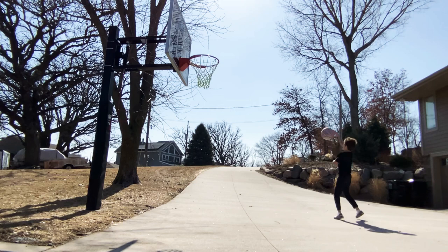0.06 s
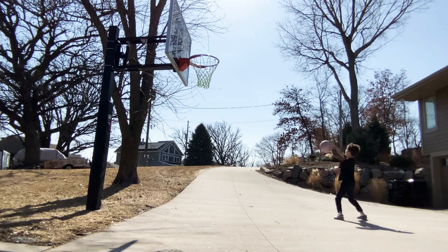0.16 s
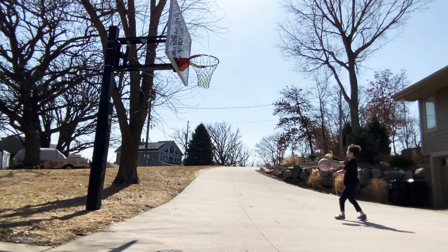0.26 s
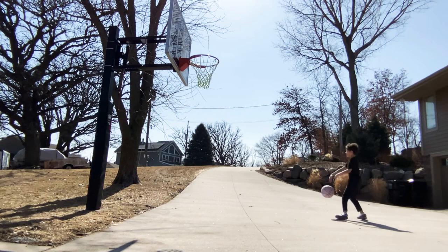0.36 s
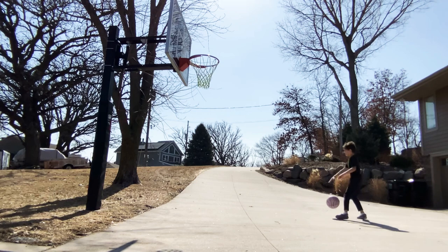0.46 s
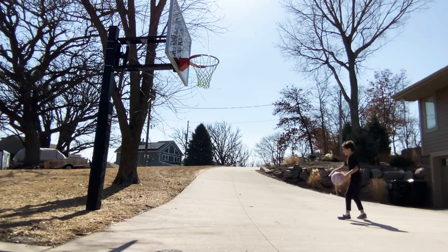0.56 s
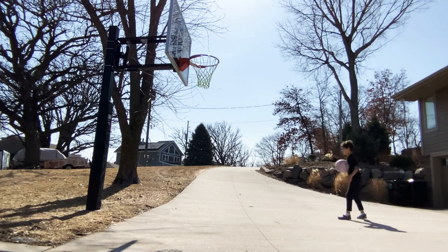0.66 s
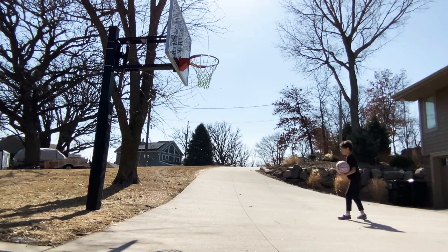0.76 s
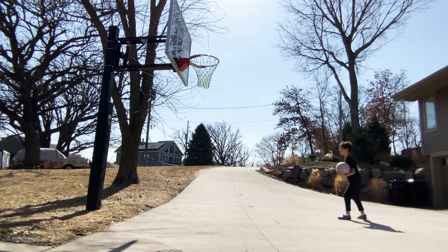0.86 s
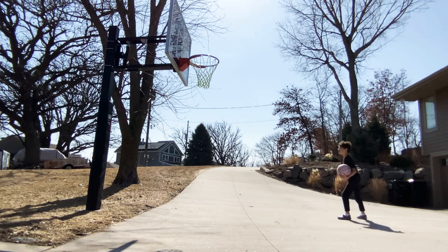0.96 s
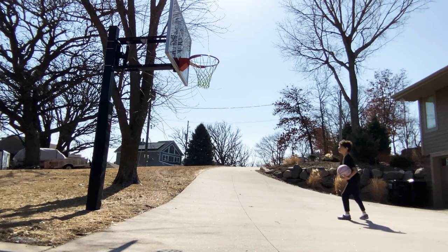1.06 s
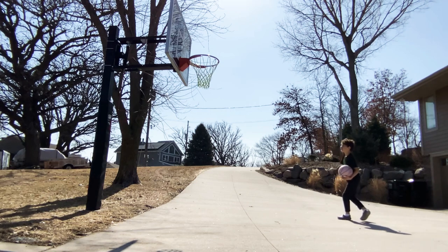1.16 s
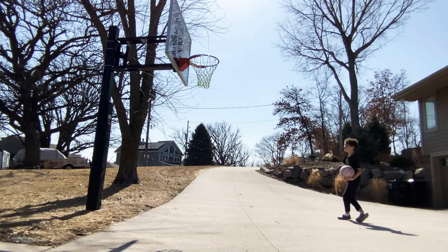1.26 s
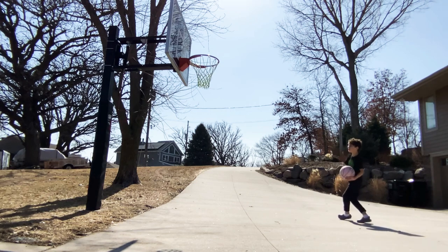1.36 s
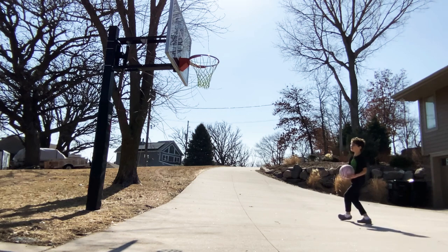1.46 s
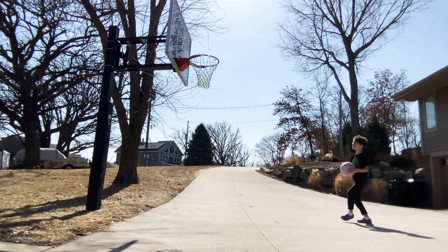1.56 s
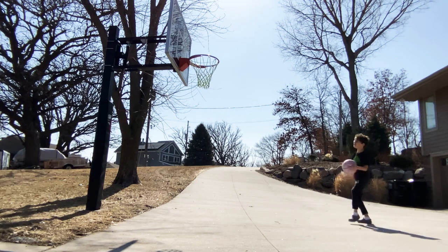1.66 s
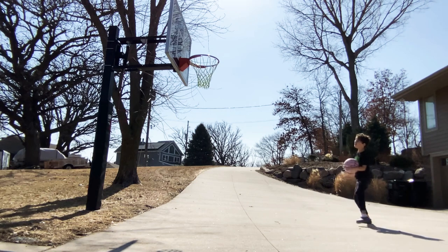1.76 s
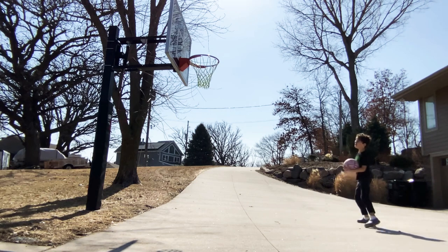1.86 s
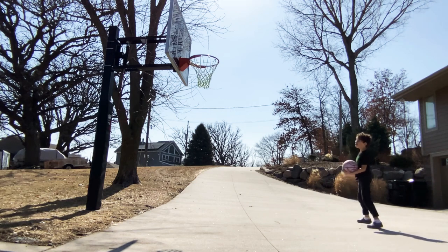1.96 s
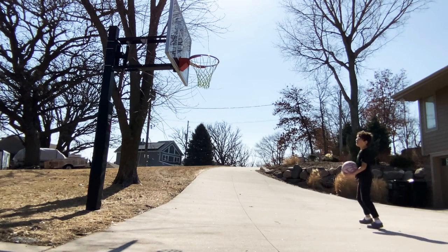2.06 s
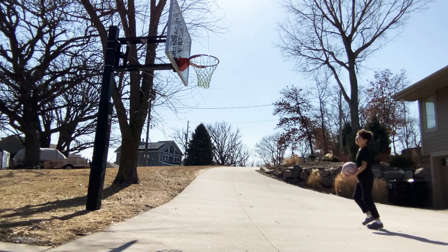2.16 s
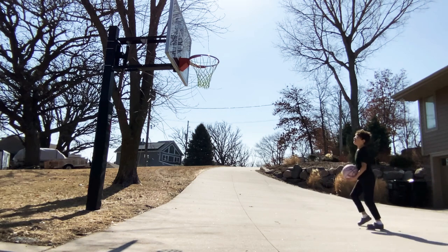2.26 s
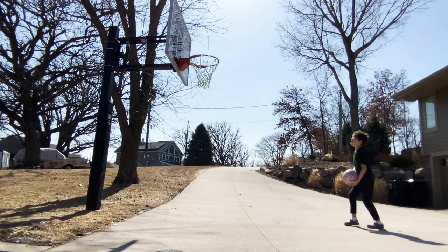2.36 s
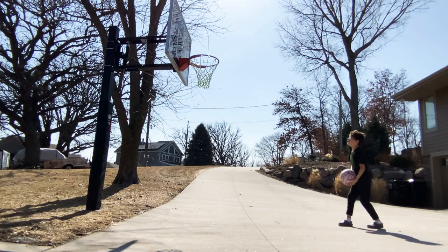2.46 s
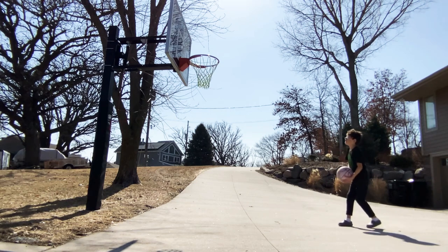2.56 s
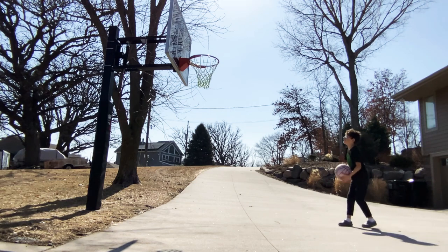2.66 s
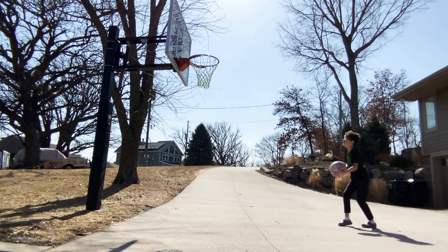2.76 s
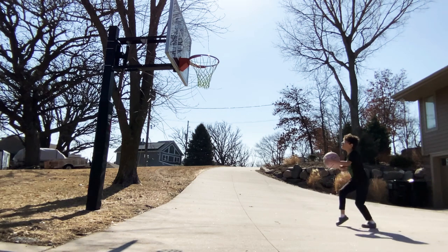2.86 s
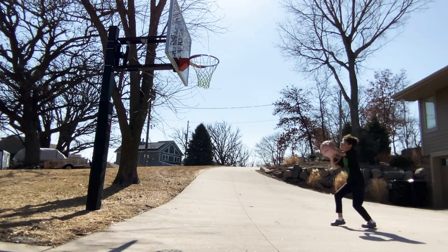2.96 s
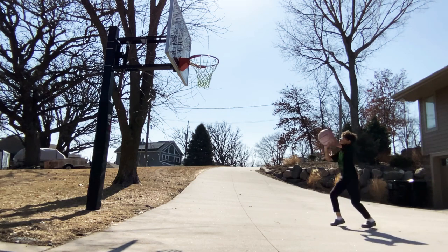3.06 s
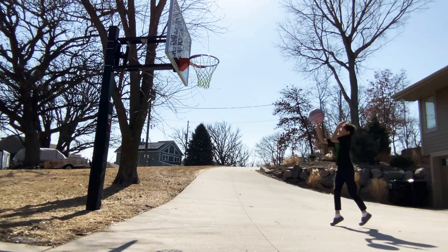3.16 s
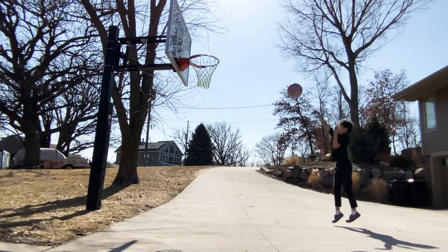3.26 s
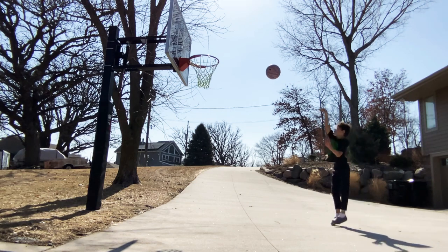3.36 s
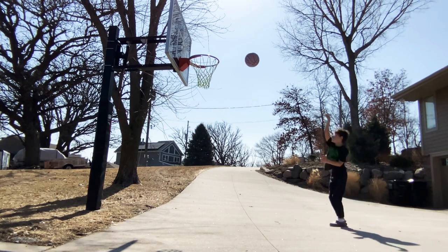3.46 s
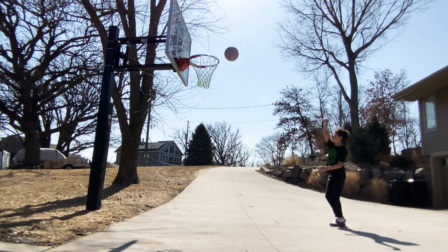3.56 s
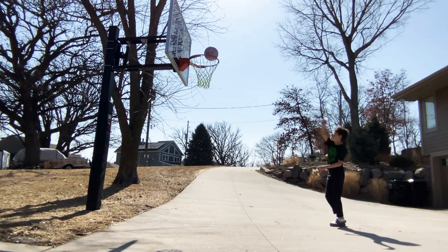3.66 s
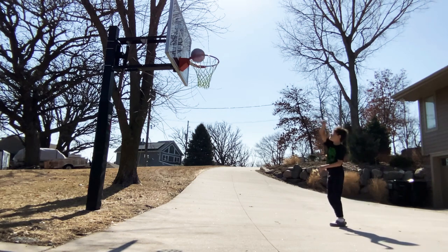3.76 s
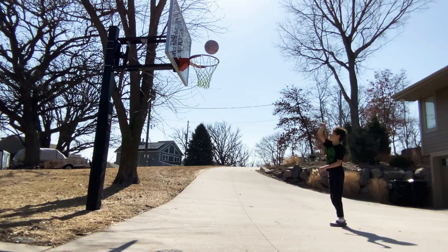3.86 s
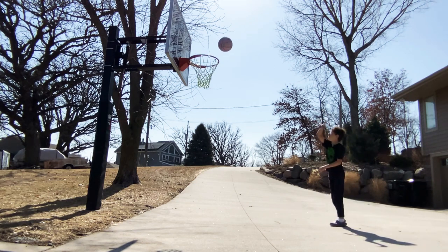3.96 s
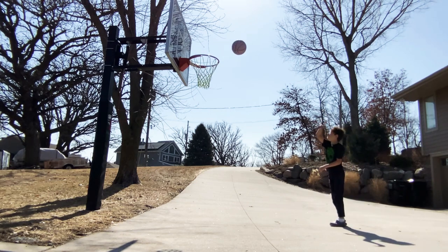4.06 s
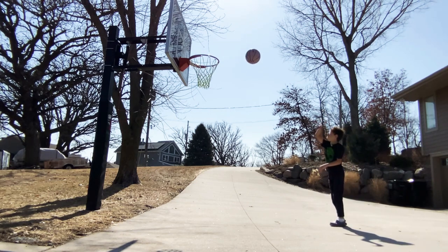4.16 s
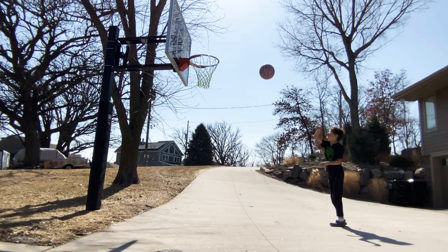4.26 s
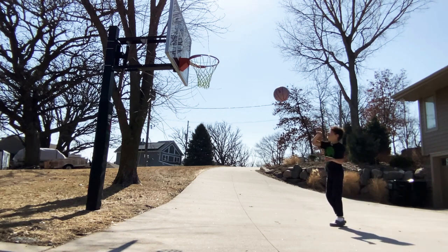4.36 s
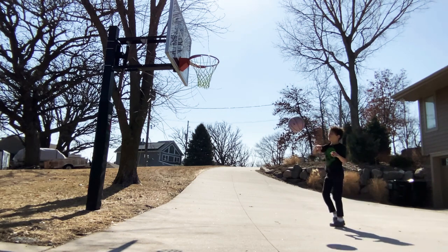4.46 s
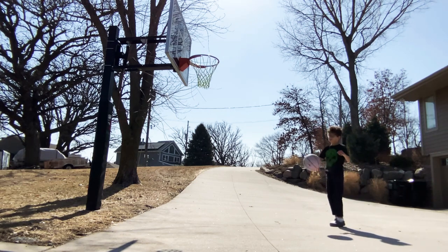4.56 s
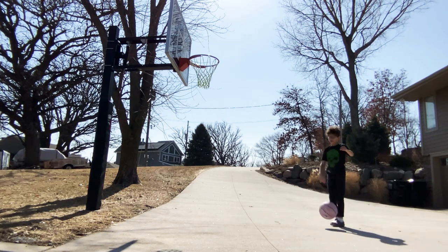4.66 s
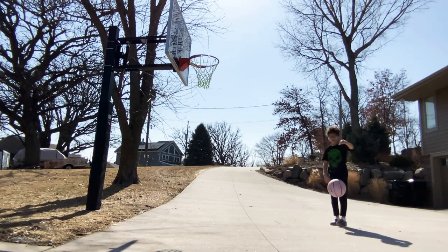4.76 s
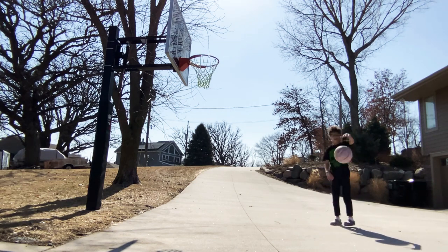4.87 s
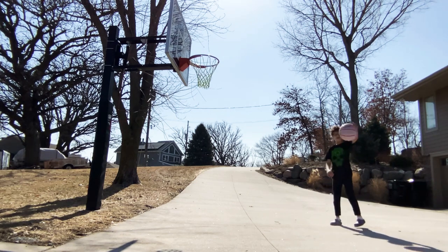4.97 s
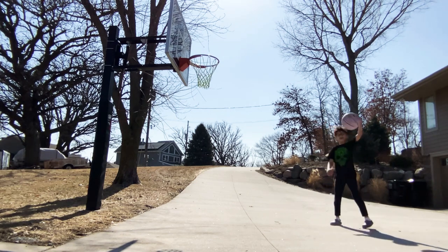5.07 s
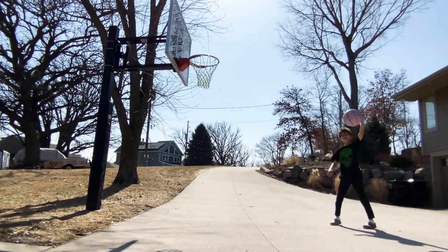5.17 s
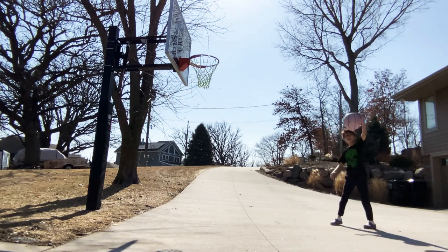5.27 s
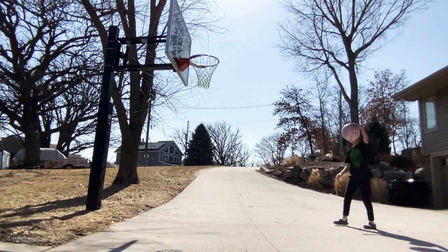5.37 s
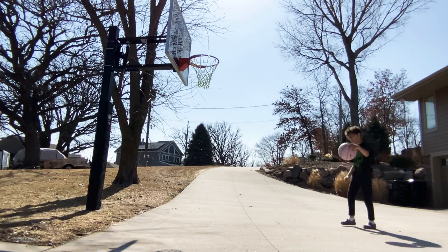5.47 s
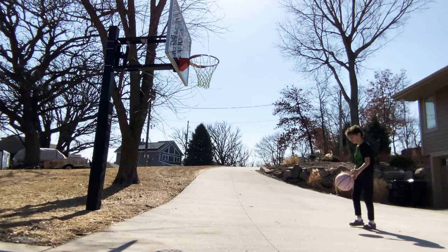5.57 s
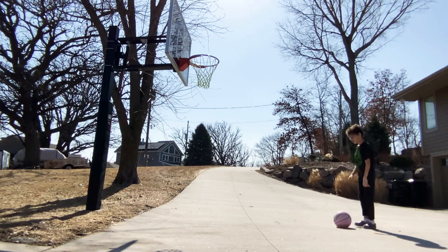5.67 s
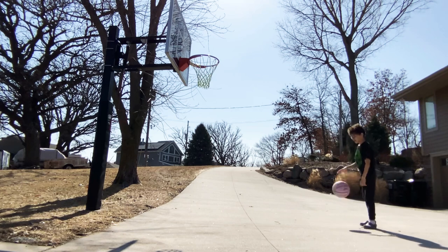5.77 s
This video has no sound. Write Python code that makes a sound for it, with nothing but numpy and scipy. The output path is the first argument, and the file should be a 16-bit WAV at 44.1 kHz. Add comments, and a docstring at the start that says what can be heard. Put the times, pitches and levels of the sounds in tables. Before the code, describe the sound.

A distant microphone hears a child playing basketball outside. First come quick gritty scuffs and one hollow, ringing bounce, then hands catching the ball. Shoes shuffle and squeak dully, pebbles crackle, and feet land after a jump. The ball knocks the hoop, low and rattly. A loud bounce, a palm smack, light drags and steps, and a last bounce finish it, with scattered short echoes and very quiet outdoor air.

```python
"""A faint outdoor rumble, then sneakers scuffing over grit: a child plays basketball on a concrete driveway.
Hands catch the ball, it bounces hard three times, and a shot knocks the hoop; house and trees answer it all.
Grit, palms and rumble are shaped noise. Rubber and the ball's skin are resonances struck by noise or tiny clicks.
The ball's air and the hoop are fading sine tones, and the echoes are dying noise tails."""
import sys
import numpy as np
from scipy import signal
from scipy.fft import rfft, irfft, next_fast_len
from scipy.io import wavfile
from scipy.ndimage import uniform_filter1d, map_coordinates

SR = 44100
rng = np.random.default_rng(int(sys.argv[2]) if len(sys.argv) > 2 else 0)


def master_out(mix):
    """Clip the mix to full scale and print it as 16-bit PCM to the path in sys.argv[1]."""
    frames = np.transpose(np.atleast_2d(mix))
    ceiling = np.clip(frames, -1, 1)
    pcm = np.round(ceiling * 32767).astype(np.int16)
    wavfile.write(sys.argv[1], SR, pcm)


N = 257103  # length in samples

# Grit under a shoe, also the pebbled skin under a palm. Each row: frequency in Hz, level in dB per Hz.
GRIT = [(300, -27), (1200, -22.5), (2100, 1.5), (2800, -9.5), (3600, -8), (4500, -4.5), (5800, 4),
        (7500, -5), (11000, 0.5), (15500, -16.5)]
# The body's weight on the slab. Each row: frequency in Hz, level in dB per Hz.
HEEL = [(80, -29.5), (160, -8.5), (350, -3.5), (600, -4), (1000, -6.5), (3000, -36.5)]
# Resonances of a rubber sole. Each row: frequency in Hz, width in Hz, level in dB.
SOLE = [(910, 240, 1), (1093, 79, 12.5), (1656, 33, 6.5), (2080, 43, -3), (3209, 340, -26)]
# The ball's wobble and the air inside it. Each row: frequency in Hz, level in dB, time to fade by 60 dB in seconds.
CAVITY = [(93, 1, 0.51), (480, 0, 0.62), (950, -10, .14), (1100, -11, 0.16), (1410, -8.5, 0.39),
          (2050, -13.5, .12)]


def amp(db):
    """Turn decibels into a plain multiplier."""
    return 10 ** (np.asarray(db) / 20)


def unit(x):
    """Scale x to an rms (average strength) of 1."""
    return x / np.sqrt(np.mean(x ** 2) + 1e-20)


def along(points, hz):
    """Read a curve of (Hz, value) points on a logarithmic frequency axis."""
    point_hz, values = np.transpose(points)
    return np.interp(np.log(hz + 1), np.log(point_hz + 1), values)


def filtered(x, response):
    """Multiply the spectrum of x by a response that depends on frequency."""
    size = next_fast_len(len(x) + SR // 4)
    spectrum = rfft(x, size) * response(np.fft.rfftfreq(size, 1 / SR))
    return irfft(spectrum, size)[:len(x)]


def coloured(x, spectrum):
    """Shape x with a curve of (Hz, dB) points, then scale it to rms 1."""
    return unit(filtered(x, lambda f: amp(along(spectrum, f))))


def peak(f, hz, width):
    """The response of one resonance, which rings only after it is struck."""
    return 1j * f * width / (hz * hz - f * f + 1j * f * width)


def body(modes, f):
    """Add up the resonances of an object, with alternating signs."""
    return sum((-1) ** k * amp(db) * peak(f, hz, width) for k, (hz, width, db) in enumerate(modes))


def second():
    """A time axis one second long."""
    return np.arange(SR) / SR


def fade(t60):
    """One second of exponential decay that falls by 60 dB in t60 seconds."""
    return np.exp(-np.log(1000) * second() / max(t60, 1e-4))


def onset(rise):
    """A soft start that approaches full level, with a time constant of rise seconds."""
    return 1 - np.exp(-second() / max(rise, 1e-5))


def noise():
    """One second of white noise."""
    return rng.standard_normal(SR)


def ring(modes):
    """Fading sine tones, at slightly new strengths for each blow."""
    total = np.zeros(SR)
    for hz, db, t60 in modes:
        tone = np.sin(2 * np.pi * (hz * second() + rng.random()))
        total += amp(db + rng.normal()) * fade(t60) * tone
    return total


def add(track, s, sound):
    """Mix a sound into the track at s seconds."""
    i = max(round(s * SR), 0)
    track[i:i + len(sound)] += sound[:len(track) - i]


def thump(rest_hz, extra_hz, glide, crest, spread):
    """The squashed ball pushes air: a few cycles that swell, die and sink in pitch."""
    t = second()
    cycles = rest_hz * t + extra_hz * glide * (1 - np.exp(-t / glide))
    swell = np.exp(-.5 * (np.log((t + 1e-6) / crest) / spread) ** 2)  # strongest at crest seconds
    return np.sin(2 * np.pi * cycles) * swell


def air():
    """Distant rumble and faint hiss: shaped noise whose level drifts slowly."""
    # The colour of the outdoor air. Each row: frequency in Hz, level in dB per Hz.
    air_colour = [(15, -39.5), (25, -8), (92, 5), (206, -4), (354, -6), (575, -8), (659, -16), (840, -11),
                  (1190, -17), (1520, -19), (1840, -20), (2550, -27.5), (3430, -32.5), (11300, -37),
                  (16000, -64.5)]
    level_db = -58.5  # rms, before the drift
    drift = np.interp(np.arange(N), np.linspace(0, N, num=18), rng.standard_normal(size=18))
    return amp(level_db + 0.35 * drift) * coloured(rng.standard_normal(N), air_colour)


def slides():
    """List whole-sole scuffs, whose rubber note sinks as the foot slows, and light toe drags, whose note rises.

    Each row: start s, length s, share before the hardest push, grit dB, rubber dB, first touch dB, Hz, Hz per s.
    """
    # The whole sole sliding. Each row: start in seconds, length in seconds,
    # share of the length before the hardest push, grit level in dB, rubber level in dB.
    scuff_rows = [(0.12, 0.033, 0.75, -34, -32.5), (0.241, 0.05, 0.35, -45.5, -50.5),
                  (0.277, 0.03, 0.29, -43, -53.5), (1.176, .11, 0.39, -32, -36.5),
                  (1.548, 0.031, 1, -42.5, -46), (1.963, 0.068, 0.76, -37, -53.5),
                  (2.132, 0.18, 0.18, -38.5, -42), (2.464, 0.089, 0.77, -31.5, -33),
                  (2.784, 0.041, 0.26, -37, -46), (2.952, 0.022, .4, -56.5, -56.5),
                  (3.05, 0.025, 0.1, -41, -42), (3.105, 0.18, 0.65, -58.5, -69),
                  (3.457, 0.15, 0.55, -57.5, -52.5)]
    # Light drags of the toe. Each row: start in seconds, length in seconds, grit level in dB.
    drag_rows = [(0.336, .12, -56.5), (0.455, .09, -59.5), (0.577, .14, -47), (1.107, 0.053, -56.5),
                 (4.337, .08, -66.5), (4.555, 0.089, -53), (4.675, .16, -45), (5.165, .09, -53.5),
                 (5.274, 0.068, -50.5)]
    scuff_touch_db, scuff_hz, scuff_glide_hz_per_s = -12, 1099, -550
    # the stiffer toe sounds higher and rises as it bends
    drag_touch_db, drag_hz, drag_glide_hz_per_s = -15.5, 1437, 4500
    drag_crest, drag_rubber_db = .6, -6  # share before the hardest push; rubber relative to grit
    rows = [(*row, scuff_touch_db, scuff_hz, scuff_glide_hz_per_s) for row in scuff_rows]
    for s, length, grit_db in drag_rows:
        rows.append((s, length, drag_crest, grit_db, grit_db + drag_rubber_db,
                     drag_touch_db, drag_hz, drag_glide_hz_per_s))
    return rows


def grains(rate, spread_db):
    """Random tiny fractures of uneven size, about rate of them per second."""
    happens = rng.random(SR) < rate / SR
    return happens * rng.choice([-1, 1], SR) * amp(spread_db * rng.standard_normal(SR))


def rubber(x):
    """Let x strike the resonances of a rubber sole, at rms 1."""
    return unit(filtered(x, lambda f: body(SOLE, f)))


def sliding_soles():
    """Sliding soles crush grit and shudder in the rubber, while the push swells and eases off."""
    out, t = np.zeros(N), second()
    lift_db = -12.5  # push at the end, relative to the hardest
    for s, length, crest, grit_db, rubber_db, touch_db, start_hz, glide in slides():
        hardest = length * np.clip(crest, .05, .95)
        push_db = np.interp(t, [0, hardest, length], [touch_db, 0, lift_db])
        contact = onset(.0015) * np.exp(-np.maximum(t - length, 0) / .007)
        # the sole catches and lets go
        slips_db = 1.9 * unit(uniform_filter1d(noise(), size=260))
        grit = coloured(grains(rate=2600, spread_db=3.0), GRIT) + amp(-16.5) * coloured(noise(), HEEL)
        # the load on the sole shifts its resonances: the shudder is read faster or slower
        speed = (start_hz + glide * np.minimum(t, length)) / SOLE[1][0]
        steady = rubber(grains(rate=830, spread_db=1.5))
        shudder = map_coordinates(steady, [np.cumsum(speed)], mode="wrap")
        slide = amp(grit_db) * grit + amp(rubber_db) * shudder
        add(out, s, slide * contact * amp(push_db + slips_db))
    return out


def footsteps():
    """Soles set down flat give a hollow rubber tap, a dull knock of weight and a little grit."""
    # Feet set down. Each row: time in seconds, rubber tap level in dB, weight level in dB, grit level in dB.
    steps = [(1.39, -32, -32.5, -45), (3.264, -39, -50, -53.5), (3.520, -47, -32.5, -37),
             (3.558, -119, -35.5, -50), (5.401, -41, -50, -45.5), (5.625, -46.5, -48, -67)]
    out = np.zeros(N)
    for s, tap_db, weight_db, grit_db in steps:
        step = amp(tap_db) * rubber(noise())
        step += amp(weight_db) * coloured(noise(), HEEL)
        step += amp(grit_db) * coloured(noise(), GRIT)
        add(out, s, step * fade(0.039) * onset(0.002))
    return out


def loose_grit(count=3):
    """A few stones skitter on after each slide; each row: time in seconds, level in dB."""
    skitter_s = 0.2  # longest wait after the slide
    skitter_db, spread_db = -9, 5.5  # level relative to the slide's grit; random spread
    top_db = -50  # limit before the random spread
    stones = []
    for s, length, _, grit_db, *_ in slides():
        for _ in range(count):
            level_db = min(grit_db + skitter_db, top_db) + spread_db * rng.normal()
            stones.append((s + length + skitter_s * rng.random(), level_db))
    return stones


def stones():
    """Single stones crack underfoot or skitter loose: very short bursts of grit noise."""
    # Stones cracking underfoot. Each row: time in seconds, level in dB.
    pops = [(1.2434, -19), (1.4371, -31), (2.0228, -21), (2.1545, -18), (2.5444, -20), (3.2106, -35),
            (3.5339, -33), (5.3118, -30)]
    out = np.zeros(N)
    for s, db in [*pops, *loose_grit()]:
        add(out, s, amp(db - 4) * coloured(noise(), GRIT) * fade(.004))
    return out


def hands():
    """A palm smacks the pebbled skin and pats the ball, which rings faintly."""
    # Hands on the ball. Each row: time in seconds, pat level in dB, smack level in dB, ring level in dB.
    touches = [(0.362, -46.5, -53, -77), (0.761, -43.5, -49, -57), (0.898, -35, -37.5, -56.5),
               (5.04, -38, -52, -60)]
    # The soft pat of a palm. Each row: frequency in Hz, level in dB per Hz.
    palm = [(60, -11), (120, -1), (280, -12.5), (470, -2.5), (700, -17), (1100, -18.5), (2500, -25.5),
            (8000, -43)]
    # A thin note from the caught ball. One row: time in seconds, frequency in Hz, level in dB,
    # time to fade by 60 dB in seconds.
    ping = (0.765, 2888, -60, .45)
    out = np.zeros(N)
    for s, pat_db, smack_db, ring_db in touches:
        pat = amp(pat_db) * coloured(noise(), palm) * fade(0.15) * onset(0.0025)
        smack = amp(smack_db) * coloured(noise(), GRIT) * fade(0.036) * onset(0.0003)
        add(out, s, pat + smack + amp(ring_db) * ring(CAVITY) * onset(0.0041))
    s, *note = ping
    add(out, s, ring([note]) * onset(.002))
    return out


def crack():
    """One sharp snap where rubber meets concrete, with a short spray of grit."""
    # The first touch on concrete. Each row: frequency in Hz, width in Hz, level in dB.
    snap = [(3560, 1200, -18), (5800, 4200, -5.5), (10800, 1800, -25.5)]
    blow = amp(-31) * noise() * fade(.03)
    blow[round(.0004 * SR)] += 1
    return filtered(blow, lambda f: body(snap, f) * peak(f, 6900, 6900))


def slap(lag, wall_delay, wall_db, wall_hz, scatter_db, scatter_t60):
    """A blow runs round the skin, treble first; the house wall and nearby things return it."""
    # The ball's rubber skin. Each row: frequency in Hz, width in Hz, level in dB.
    skin_modes = [(245, 140, 0), (318, 230, -0.5), (485, 61, 0), (617, 17, -10), (1021, 215, 10.5),
                  (1041, 370, 7.5), (1616, 150, -1.5), (2210, 140, -2), (3360, 3600, -17),
                  (5400, 1100, -11)]
    blow = amp(scatter_db) * noise() * fade(scatter_t60)
    blow[0] += 1

    def response(f):
        bending = np.exp(-4j * np.pi * lag * np.sqrt(f * 1000))  # delays the bass more than the treble
        echo = amp(wall_db) * np.exp(-2j * np.pi * f * wall_delay) / (1 + 1j * f / wall_hz) ** 2
        return body(skin_modes, f) * bending * (1 + echo)

    return filtered(blow, response)


def bounces():
    """Each bounce: a crack on the concrete, the skin's slap, a low thump and the ring of the ball."""
    # Ball on concrete. Each row: time in seconds, slap level in dB, thump level in dB, crack level in dB,
    # brightness of the slap in dB per octave.
    hits = [(0.5545, 21, -14.5, 8.5, -1.6), (4.8075, 26.5, -11, 15.5, .7), (5.7888, 24, -14.5, 5, -.6)]
    out = np.zeros(N)
    push = thump(rest_hz=92, extra_hz=447, glide=.006, crest=.0165, spread=.4)
    for s, slap_db, thump_db, crack_db, tilt in hits:
        skin = slap(lag=.0017, wall_delay=.0093, wall_db=-5, wall_hz=2800, scatter_db=-33, scatter_t60=.07)
        skin = filtered(skin, lambda f: amp(tilt * np.log2((f + 100) / 1000)))
        hum = amp(-68.0) * ring(CAVITY) * onset(0.0012)
        add(out, s, amp(crack_db) * crack() + amp(thump_db) * push)
        add(out, s, amp(slap_db) * (skin + hum))
    return out


def hoop():
    """The shot thuds on the hoop; the board hums and its mount rattles."""
    # Ball on the hoop. Each row: time in seconds, ring level in dB, rattle level in dB.
    hits = [(3.871, -35, -35.5), (3.950, -49, -42.5), (4.027, -71, -48.5)]
    # Board, rim and pole. Each row: frequency in Hz, level in dB, time to fade by 60 dB in seconds.
    hoop_modes = [(86, -9, .5), (145, 1, .65), (215, -12, .4), (463, -5, .3), (510, -11, .22),
                  (953, -22, .3), (1550, -24, .3)]
    # The rattling mount. Each row: frequency in Hz, level in dB per Hz.
    rattle = [(200, 0), (500, 8.5), (800, -6.5), (1600, -4), (2200, -8), (3000, -21), (6000, -21),
              (15000, -30.5)]
    out = np.zeros(N)
    for s, ring_db, rattle_db in hits:
        add(out, s, amp(ring_db) * ring(hoop_modes) * onset(0.005))
        add(out, s, amp(rattle_db) * coloured(noise(), rattle) * fade(0.25) * onset(0.00033))
    thud = thump(rest_hz=87.5, extra_hz=282.7, glide=0.0057, crest=0.012, spread=0.29)
    add(out, hits[0][0], amp(-24) * thud)
    return out


def yard(x, build):
    """Scattered echoes from house, rocks and trees build up and die, with a new tail every half second."""
    # How long echoes last. Each row: frequency in Hz, time to fade by 60 dB in seconds.
    yard_t60 = [(100, 0.38), (500, 0.35), (1500, 0.43), (5000, 0.38), (12000, 0.4)]
    # How strong echoes are. Each row: frequency in Hz, level in dB.
    yard_gain = [(70, 0.5), (110, -13), (300, -9), (700, -9.5), (1050, -15), (1550, -8.5), (2100, -15),
                 (2800, -6.5), (5500, -17.5), (12000, -16.5)]
    out = np.zeros(N)
    for i in np.arange(0, N, SR // 2):
        # noise split into short moments and pitches, so each pitch can fade at its own pace
        hz, t, z = signal.stft(noise(), SR, nperseg=256)
        decay = amp(-60 * t / along(yard_t60, hz)[:, None])
        z = z * decay * (1 - np.exp(-(t / build) ** 2))
        tail = signal.istft(z, SR, nperseg=256)[1]
        tail = filtered(tail / np.linalg.norm(tail), lambda f: amp(along(yard_gain, f)))
        add(out, i / SR, signal.fftconvolve(x[i:i + SR // 2], tail))
    return out


def scene():
    """Mix the play, its echoes from the yard and the outdoor air."""
    shoes = sliding_soles() + footsteps() + stones()
    play = shoes + hands() + bounces() + hoop()
    return (play + yard(play, build=0.024) + air())[None]


def record(dry):
    """The microphone sheds the lowest bass, its port carves two treble dips, and a band limit cuts the top."""
    # Dips of the microphone port. Each row: frequency in Hz, width in Hz, depth from 0 to 1.
    dips = [(8360, 1200, .7), (12740, 3000, 0.9)]
    low_hz, top_hz = 40.3, 16000  # bass roll-off and band limit

    def response(f):
        port = np.prod([1 - np.clip(depth, 0, 1) * peak(f, hz, width) for hz, width, depth in dips], axis=0)
        bass = 1 - 1 / (1 + (f / low_hz) ** 4)
        top = np.clip((top_hz - f) / 300 + .5, 0, 1)
        return port * bass * top

    return filtered(dry[0], response)[None]


dry = scene()
out = record(dry)
master_out(out)
```